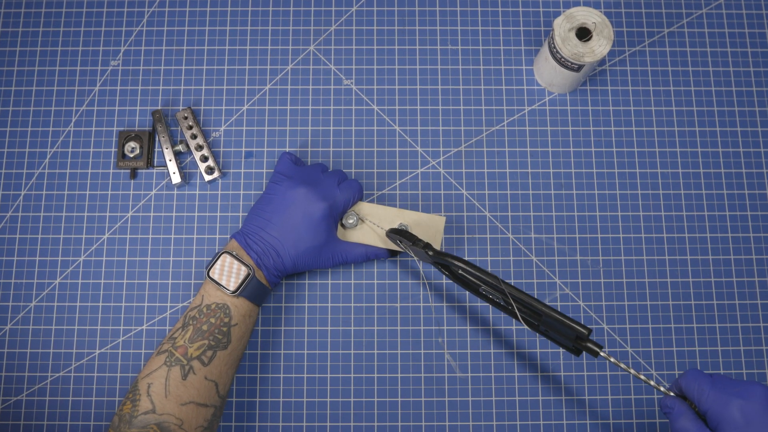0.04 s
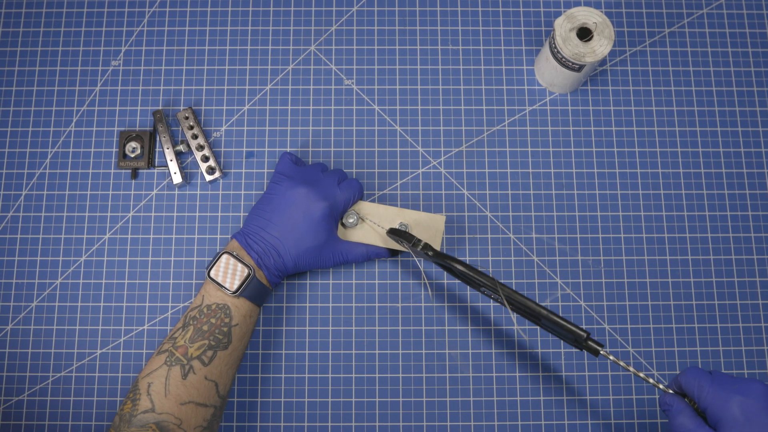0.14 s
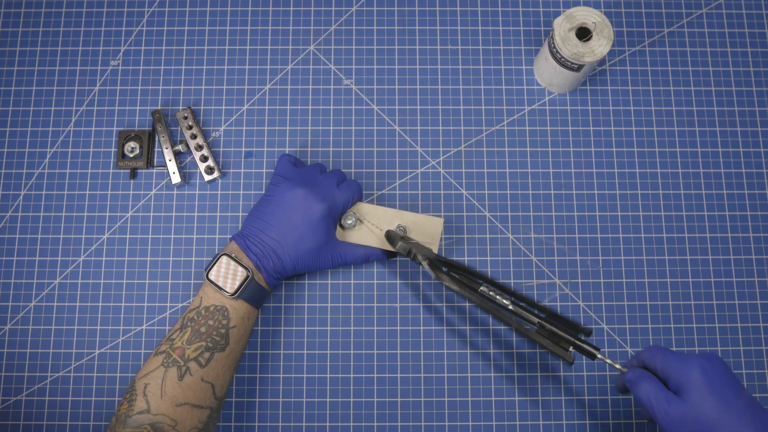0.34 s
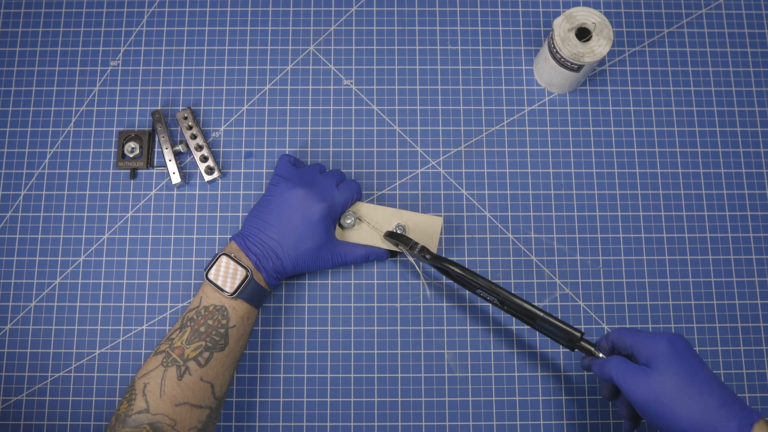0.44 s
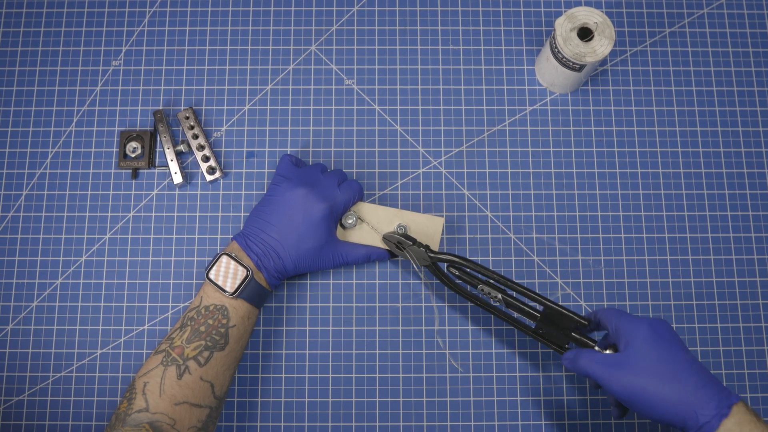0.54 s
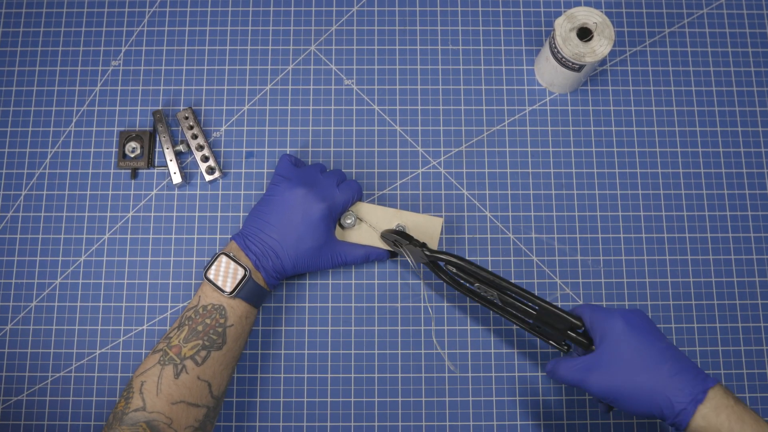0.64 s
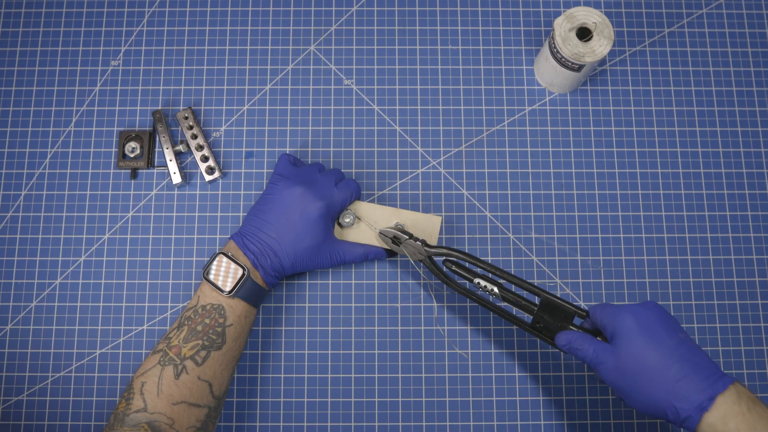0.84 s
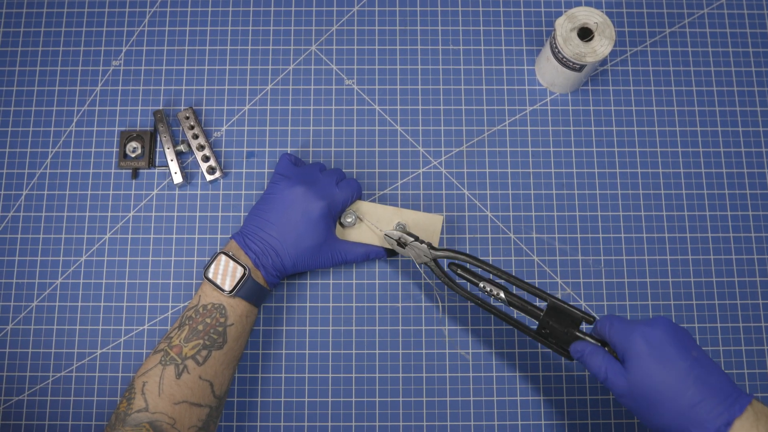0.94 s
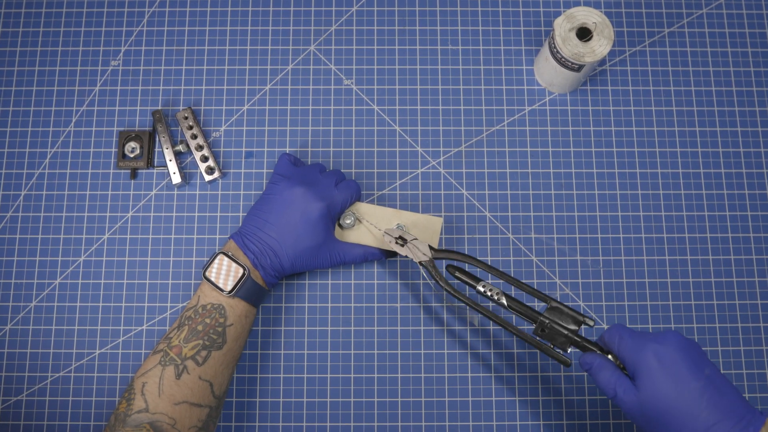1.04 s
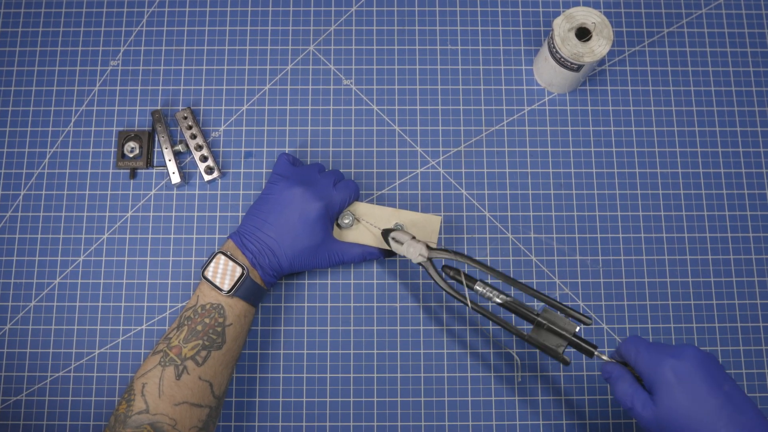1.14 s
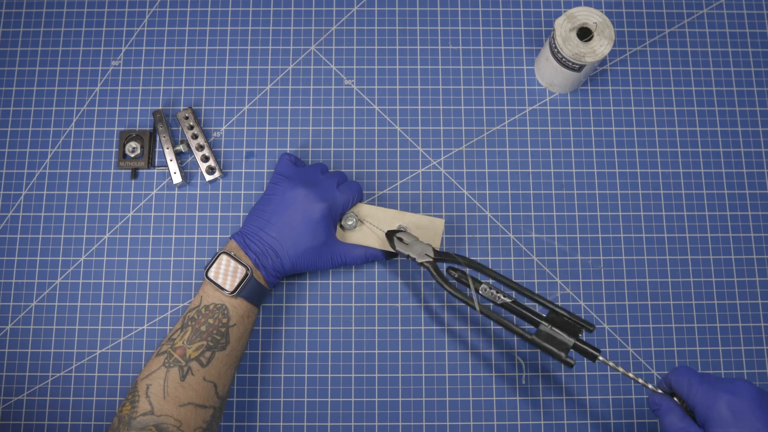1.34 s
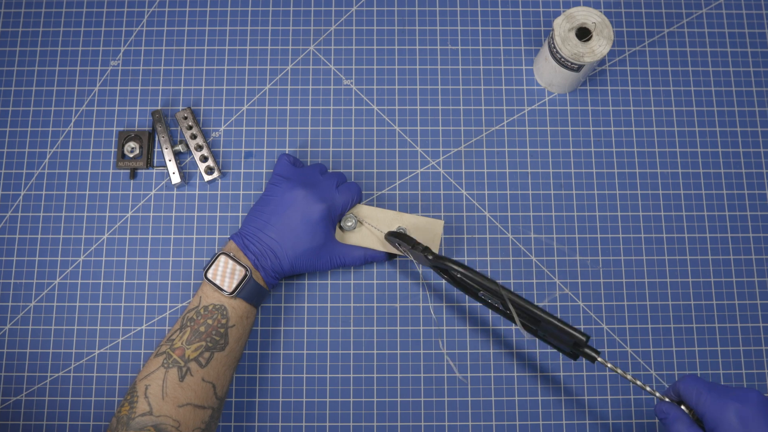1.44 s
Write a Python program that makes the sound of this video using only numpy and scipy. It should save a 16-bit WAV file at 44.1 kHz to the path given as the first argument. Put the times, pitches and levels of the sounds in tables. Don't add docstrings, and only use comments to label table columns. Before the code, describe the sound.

Wire-twisting pliers clicking and rasping, with one hard metal slam, close up in a quiet workshop

```python
import sys
import numpy as np
from scipy import signal
from scipy.fft import rfft, irfft
from scipy.io import wavfile
from scipy.ndimage import uniform_filter1d

SR = 44100
rng = np.random.default_rng(int(sys.argv[2]) if len(sys.argv) > 2 else 0)


def elevation(decibels):
    levels = np.asarray(decibels, float)
    return 10 ** (levels / 20)


def unload_wav(signal):
    wavfile.write(
        sys.argv[1],
        SR,
        np.round(np.clip(np.atleast_2d(signal).T, -1, 1) * 32767).astype(np.int16),
    )


N = 66150
STRIKE = 6000


def unit(x):
    return x / np.sqrt(np.mean(x ** 2) + 1e-30)


def curve(rows):
    return np.interp(np.arange(N) / SR, *np.array(rows).T)


def colour(x, points):
    hz, db = np.array(points).T
    f = np.maximum(np.arange(len(x) // 2 + 1) * SR / len(x), 1)
    gain_db = np.interp(np.log(f), np.log(hz), db, left=-70, right=-70)
    return irfft(rfft(x) * elevation(gain_db), len(x))


def around(x, low_hz, high_hz):
    return signal.lfilter(*signal.butter(1, [low_hz, high_hz], "band", fs=SR), x)


def fade(t60, size=STRIKE):
    return np.exp(-np.log(1000) * np.arange(size) / SR / max(t60, .002))


def ring(hz, t60):
    return fade(t60) * np.sin(2 * np.pi * hz * np.arange(STRIKE) / SR)


def add(out, s, x):
    i = int(s * SR)
    out[i:i + len(x)] += x[:N - i]


def walk(rate):
    hold = int(SR / rate)
    steps = np.repeat(rng.standard_normal(N // 50), hold)[:N]
    return unit(uniform_filter1d(steps, hold))


# pitch_hz, level_db (per Hz)
AIR_TONE = [(88, -17.5), (150, -3.5), (618, -15), (709, -15), (1070, -8), (1280, -4.5), (1530, -19.5),
            (10300, -20.5), (13500, -39)]


def room_air():
    return unit(colour(rng.standard_normal(N), AIR_TONE)) * elevation(-80.5 + 0.5 * walk(9.8))


# start_s, level_db
SWAY = [
    (0, -45.5),
    (.07, -60.5),
    (.5, -56),
    (.8, -62),
    (.95, -45.5),
    (1.07, -49),
    (1.25, -54),
    (1.33, -55.5),
    (1.5, -54.5),
]
# pitch_hz, level_db (per Hz)
RUMBLE_TONE = [(8.8, -34), (15, 7), (36, 3), (70, -3.5), (107, -20), (300, -31), (390, -55.5), (660, -120)]


def rumble():
    return unit(colour(rng.standard_normal(N), RUMBLE_TONE)) * elevation(curve(SWAY))


# start_s, level_db
SHIFT = [(0, -75), (.05, -77), (.2, -71.5), (.3, -69), (.47, -66.5), (.62, -62), (.72, -72), (.85, -65),
         (1., -69), (1.1, -82), (1.25, -64), (1.33, -76.5), (1.5, -77.5)]
# pitch_hz, level_db (per Hz)
MAT_TONE = [(71, -35.5), (120, 2), (393, -9.5), (710, -11), (1100, -18), (1480, -14), (3500, -22),
            (4550, -22.5), (7700, -120)]


def rustle():
    grain = rng.standard_normal(N) * elevation(2 * walk(120))
    return unit(colour(grain, MAT_TONE)) * elevation(curve(SHIFT))


# start_s, level_db, pitch_hz, t60_s
KNOCKS = [(0.112, -53, 119, 0.12), (0.2237, -38.5, 1287, 0.015), (0.4011, -35, 753, 0.014),
          (0.402, -49.5, 377, 0.2), (.434, -27, 1290, 0.011), (0.437, -47.5, 201, 0.12),
          (.440, -31, 655, 0.0084), (.443, -41.5, 1090, 0.068), (0.465, -45, 590, 0.0073),
          (0.62, -56, 129, 0.15), (.810, -49.5, 547, 0.045), (0.813, -52, 107.4, 0.36),
          (0.904, -31, 186.7, 0.075), (0.909, -45.5, 578, 0.032), (1.055, -61.5, 925, 0.077),
          (1.190, -45, 523, 0.059), (1.194, -53, 824, 0.037), (1.214, -40, 2295, 0.08),
          (1.362, -57.5, 1522, 0.11), (1.402, -53.5, 755, 0.051)]
KNOCK_NOISE_DB, PUSH_CYCLES = -4, 0.5


def knocks():
    out = np.zeros(N)
    for s, db, hz, t60 in KNOCKS:
        scatter = unit(around(rng.standard_normal(STRIKE), hz / 3, hz * 2))
        dull_db = 15 if hz > 1400 else 7 if hz < 190 else 0
        tone = np.sign(190 - hz) * ring(hz, t60)
        knock = tone + elevation(KNOCK_NOISE_DB - dull_db) * scatter * fade(2.46 * t60)
        push = np.hanning(int(PUSH_CYCLES * SR / hz) + 3)
        add(out, s, elevation(db) * np.convolve(knock, push / push.sum()))
    return out


# pitch_hz, level_db, t60_s
STEEL = [(2162, -9, 0.093), (2660, -13, 0.046), (3160, -9.5, 0.03), (3210, -23, 0.2), (4230, -3.5, 0.015),
         (5000, -30.5, 0.034), (6660, -3.5, 0.029), (7350, -11, 0.097), (7720, -13, 0.04),
         (8130, -13.5, 0.15), (9900, -42, 0.082), (9250, -20.5, 0.064), (11060, -14, 0.089),
         (13000, -31, 0.015)]
# start_s, level_db
RUB = [(0, -91), (.09, -93), (.2, -64), (.25, -56.5), (.31, -61), (.45, -60.5), (.5, -68.5), (.61, -69.5),
       (.69, -91), (.78, -64.5), (.88, -75.5), (.94, -71.5), (1.042, -74.5), (1.054, -67.5), (1.14, -56),
       (1.26, -64.5), (1.39, -68), (1.43, -90.5)]
# pitch_hz, level_db (per Hz)
RASP_TONE = [(470, -33), (800, -5.5), (943, -13), (2320, -6), (2700, -11.5), (4420, -9.5), (6630, -3.5),
             (15300, -12), (16500, -36.5)]
SLIPS_PER_S, SLIP_SPREAD_DB, FLICKER_DB, PATCHY_DB, RASP_RING_DB = 2200, 4.6, 3, 4.2, -3
HISS_HZ = 6800
REACH_DB_PER_OCT, GRIP_DAMP = -11, .5


def rasp():
    happens = rng.random(N) < SLIPS_PER_S / SR
    sign = np.sign(rng.standard_normal(N))
    size = elevation(SLIP_SPREAD_DB * np.minimum(rng.exponential(size=N), 3.5))
    slips = happens * sign * size * elevation(FLICKER_DB * walk(40.14))
    rung, patches = np.zeros(N), np.zeros(N)
    for hz, db, t60 in STEEL:
        flaring = slips * elevation(PATCHY_DB * walk(40.4))
        mode_db = db + REACH_DB_PER_OCT * abs(np.log2(hz / HISS_HZ)) / 2
        rung += signal.fftconvolve(flaring, elevation(mode_db) * ring(hz, GRIP_DAMP * t60))[:N]
    for k, hz in enumerate(300 * 1.5 ** np.arange(11)):
        shifted = np.roll(slips, 997 * k)
        patches += around(shifted, hz / 1.25, hz * 1.25) * elevation(PATCHY_DB * walk(60))
    return (unit(colour(patches, RASP_TONE)) + elevation(RASP_RING_DB) * unit(rung)) * elevation(curve(RUB))


# start_s, level_db, pitch_hz, t60_s
PINGS = [(.2225, -36.5, 2780, 0.012), (.224, -47, 10520, 0.037), (.239, -47.5, 8900, 0.031),
         (.301, -54, 5960, 0.061), (.308, -56.5, 2296, 0.085), (.318, -65, 6800, 0.035),
         (.321, -55, 11000, .05), (.370, -55, 7500, 0.044), (.383, -45, 7500, 0.023),
         (.386, -57, 2580, .04), (.404, -36, 7780, 0.071), (.406, -31, 2516, 0.028),
         (.407, -33, 3237, 0.035), (.402, -40.5, 749, .05), (.410, -49, 11300, 0.045),
         (.645, -54.5, 3780, 0.039), (.645, -52, 5580, 0.038), (.645, -47, 7250, .07),
         (.646, -48, 8940, 0.024), (.180, -33.5, 6730, 0.024), (.809, -53, 533, 0.031),
         (.810, -64, 780, 0.027), (.818, -61, 490, 0.024), (.835, -43.5, 9200, 0.037),
         (.835, -46.5, 5950, 0.046), (.835, -50.5, 5200, .03), (1.107, -51, 6310, .04),
         (1.142, -58, 2330, .08), (1.176, -54, 8300, .05), (1.190, -47.5, 311, 0.019),
         (1.190, -49, 796, .04), (1.189, -46, 102.6, 0.16), (1.197, -51.5, 653, 0.053),
         (1.201, -56, 400, .04), (1.212, -35, 7780, 0.021), (1.212, -37.5, 11970, 0.027),
         (1.216, -26.5, 6430, 0.024), (1.230, -45, 2290, 0.047), (1.230, -59, 1110, .1),
         (1.244, -57, 8200, .06), (1.266, -54, 6610, .03), (1.289, -53.5, 10270, 0.074),
         (1.289, -52, 8070, 0.051), (1.360, -46, 4610, 0.014), (1.361, -50.5, 4030, 0.034),
         (1.392, -53.5, 6800, 0.032), (1.403, -53.5, 3860, 0.038), (1.404, -50, 6800, 0.025)]
PING_RISE_S, PING_WOBBLE_DB = .0006, 4.5


def pings():
    out = np.zeros(N)
    for s, db, hz, t60 in PINGS:
        wobble = unit(uniform_filter1d(rng.standard_normal(STRIKE), size=70))
        level = elevation(db + PING_WOBBLE_DB * np.tanh(wobble))
        add(out, s, -level * ring(hz, t60) * (1 - fade(7 * PING_RISE_S)))
    return out


# start_s, level_db, pitch_hz
TAPS = [(0.1797, -34.5, 8300), (0.26, -43, 8900), (.4006, -21.5, 2140), (0.4006, -29, 4400),
        (.5175, -46.5, 2150), (0.5256, -49, 2200), (0.7349, -50, 2320), (.906, -43.5, 1740),
        (0.9089, -34, 2170), (0.9133, -32.5, 6800), (1.069, -43, 8470), (1.2163, -33, 6740),
        (1.361, -38.5, 12300), (1.363, -49, 2720), (1.4035, -48, 1900)]


def taps():
    out = np.zeros(N)
    for s, db, hz in TAPS:
        add(out, s, -elevation(db) * ring(hz, .005))
    return out


# start_s, level_db, favoured pitch_hz, low_body_db, chatter_ms
CLICKS = [(0.0942, -55.5, 6400, -29, 3.6), (0.1095, -52.5, 6440, -28, 3.8),
          (0.1795, -34.5, 7560, -20, 0.71), (0.222, -25.5, 7190, -4, 0.63), (0.2591, -40, 8950, -12, 1.4),
          (0.518, -46, 6000, 4, .6), (0.5429, -40.5, 9470, -30, 2.9), (0.6444, -34, 8070, -19, 2),
          (0.7345, -68, 5000, -4, 0.54), (0.7652, -57, 2110, 8, 2.8), (0.8351, -37.5, 6960, -14, 1.4),
          (0.9048, -35.5, 9250, -11, 1.17), (0.9094, -25.5, 6650, -11.5, 1.42),
          (0.9614, -44, 6220, -9.5, 2.8), (1.059, -41.5, 6110, -5, 1.94), (1.1334, -39, 9650, -32, 4.2),
          (1.1418, -33.5, 8600, -18, 3.6), (1.1757, -41, 8570, -31, 3.5), (1.2122, -26, 7180, -40, 1.4),
          (1.2894, -46.5, 8150, -38, 2), (1.3596, -38.5, 6250, -11.5, 1.58)]
MORE_CLICKS = [(.130, -53, 9100, -19, 1.5), (.239, -53, 10100, -20, 2.2), (.316, -43.5, 6150, -5.5, 4.6),
               (.466, -38.5, 8650, -11, 0.82), (.526, -59, 2280, 1, 0.88), (.559, -44.5, 5750, -6.5, 2.3),
               (.850, -50, 5630, -17, 1), (1.051, -48, 6600, -10, 1), (1.128, -40, 6800, -10, 1.5),
               (1.146, -41.5, 4030, -11, 0.86), (1.195, -44.5, 9900, -30, 12), (1.244, -48.5, 10300, -24, 4.1),
               (1.403, -46.5, 5740, -22, 1.8)]
# pitch_hz, level_db
CRACK_TONE = [(1000, -3.5), (2500, 6), (4500, -7), (7000, 1), (9000, -8), (12000, -10.5), (16000, -7)]
CLICK_TRIM_DB, CHATTER_PER_S = -2, 2500
SPLIT_HZ = 3800
FAVOURED_DB, FAVOURED_T60_S, RING_SCATTER_DB = 3.5, 0.023, 6
CRACK_DB, TAIL_DB, TAIL_T60_S = -5, -1.5, 0.063


def click_lean_db(f, favoured_hz, low_db):
    if f < SPLIT_HZ:
        return low_db
    return REACH_DB_PER_OCT * abs(np.log2(f / max(favoured_hz, SPLIT_HZ)))


def clicks():
    out, t = np.zeros(N), np.arange(1500) / SR
    for s, db, hz, low_db, ms in list(CLICKS) + list(MORE_CLICKS):
        luck, noise = rng.standard_normal((2, len(STEEL))), rng.standard_normal((2, STRIKE))
        ms = max(ms, .3)
        u = t / (ms / 2000)
        contacts = (rng.random(1500) < CHATTER_PER_S / SR) * noise[0, :1500] * u * np.exp(1 - u)
        contacts[0] = 1
        looseness = np.sqrt(ms / 2)

        body = elevation(FAVOURED_DB) * ring(hz, FAVOURED_T60_S * looseness)
        for (f, mode_db, t60), louder, sharper in zip(STEEL, *luck):
            level = elevation(mode_db + RING_SCATTER_DB * louder + click_lean_db(f, hz, low_db))
            damped_t60 = GRIP_DAMP * t60 * looseness * min(1, hz / f)
            body += level * ring(f * (1 + 0.023 * sharper), damped_t60)

        tone = []
        for f, tone_db in CRACK_TONE:
            share = 1 if f < SPLIT_HZ else 2
            tone.append((f, tone_db + click_lean_db(f, hz, low_db) / share))
        decay = elevation(CRACK_DB) * fade(0.018) + elevation(TAIL_DB) * fade(TAIL_T60_S * looseness)
        hiss = colour(noise[1], tone) * decay
        x = signal.fftconvolve(body + 2 * hiss, contacts)
        add(out, s, elevation(db + CLICK_TRIM_DB) * x / np.abs(x).max())
    return out


# pitch_hz, level_db
SNAP = [(1900, -4.5), (2500, 3), (3900, -26), (5100, 4.5), (6700, 8), (8300, -11), (9800, -29)]
SLAM_S, SLAM_DB, SNAP_DB, SNAP_T60_S = .4005, -13, 5, 0.012
RATTLE_DB, RATTLE_T60_S, RATTLE_HOLD_S, RATTLE_AFTER_DB = 0.5, 0.083, .018, -11


def slam():
    out, noise = np.zeros(N), rng.standard_normal((2, STRIKE))
    body = sum(elevation(db) * ring(hz, t60) for hz, db, t60 in STEEL)
    snap = -sum(elevation(db) * ring(hz, SNAP_T60_S) for hz, db in SNAP)
    grains = elevation(.8 * unit(uniform_filter1d(noise[1], size=60)))
    rattle = unit(colour(noise[0] * grains, CRACK_TONE)) * fade(RATTLE_T60_S)
    since_hold = np.arange(STRIKE) / SR - RATTLE_HOLD_S
    held = np.interp(since_hold, [-.008, .004], [1, elevation(RATTLE_AFTER_DB)])
    x = (body + elevation(RATTLE_DB) * rattle) * held + elevation(SNAP_DB) * snap
    add(out, SLAM_S, elevation(SLAM_DB) * x / np.abs(x).max())
    return out


PORT_LAG_S, SIDE_FROM_HZ, DIFFUSE_DB, HISS_DB = 1.95e-5, 400, -10, -78


def two_ports(mid):
    f = np.arange(N // 2 + 1) * SR / N
    half_lag = np.pi * f * PORT_LAG_S
    reflections = unit(rng.standard_normal(300) * fade(.006, size=300)) / np.sqrt(300)
    echo = signal.fftconvolve(mid, reflections)[:N]
    spread = rfft(mid) + elevation(DIFFUSE_DB) * rfft(echo)
    side = -1j * np.sin(half_lag) * spread / (1 + (SIDE_FROM_HZ / (f + 1)) ** 2)
    hiss_shape = np.exp(-np.log2((f + 1) / HISS_HZ) ** 2)
    hiss = rfft(rng.standard_normal((2, N))) * elevation(HISS_DB) * hiss_shape
    return irfft(rfft(mid) * np.cos(half_lag) + side * np.array([[1], [-1]]) + hiss, N)


def scene():
    background = room_air() + rumble() + rustle()
    tool = knocks() + rasp() + pings() + taps() + clicks() + slam()
    return two_ports(background + tool)


def low_pass(x):
    return signal.sosfilt(signal.butter(12, 16680, fs=SR, output="sos"), x)


def record(dry):
    top_cut = signal.ellip(8, .2, 70, 16350, fs=SR, output="sos")
    mix = signal.sosfilt(top_cut, dry)
    return low_pass(mix)


dry = scene()
out = record(dry)
unload_wav(out)
```